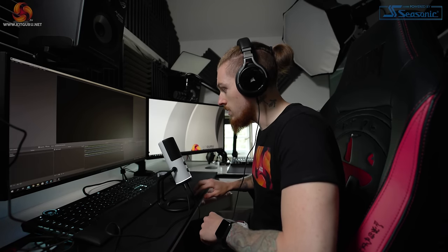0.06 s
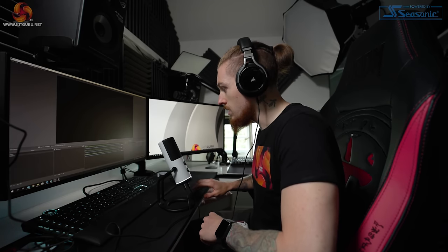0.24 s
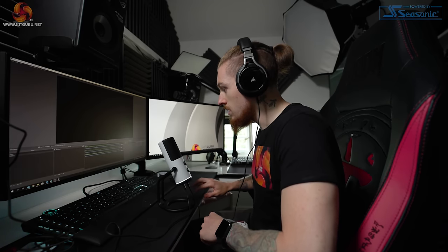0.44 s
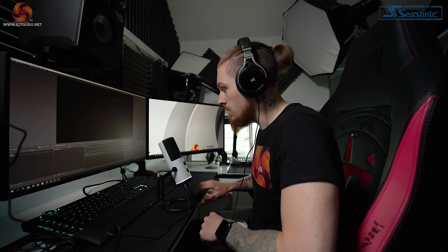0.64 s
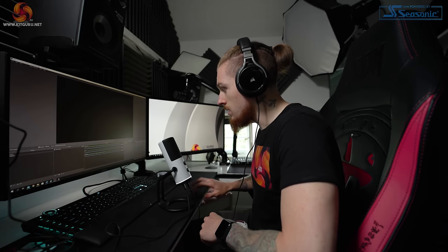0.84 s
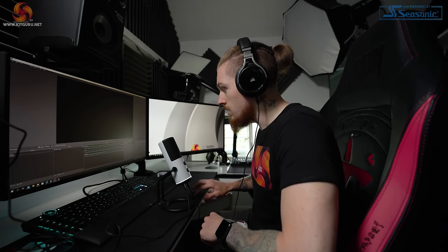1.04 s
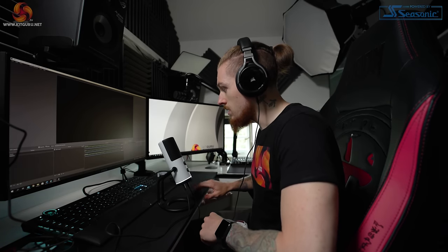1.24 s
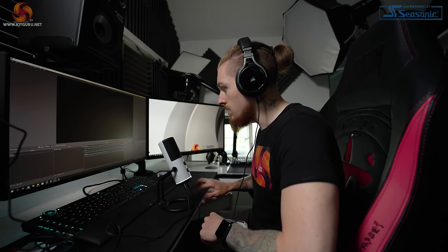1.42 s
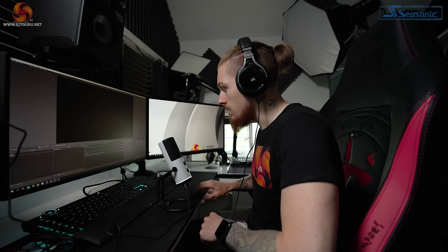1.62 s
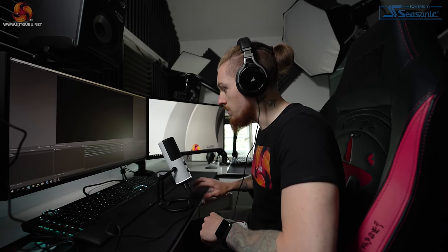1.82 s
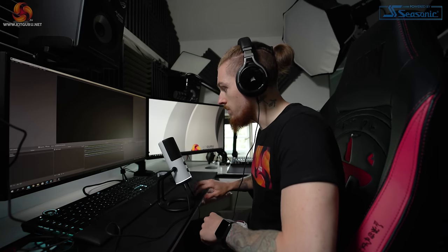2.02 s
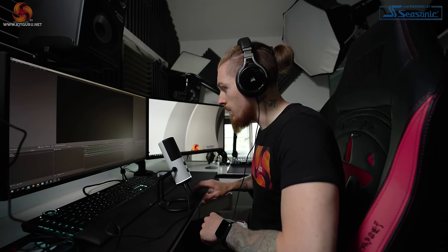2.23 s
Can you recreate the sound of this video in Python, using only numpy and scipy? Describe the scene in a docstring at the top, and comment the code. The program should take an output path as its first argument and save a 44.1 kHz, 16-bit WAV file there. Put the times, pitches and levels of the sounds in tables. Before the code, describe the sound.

Soft, boomy finger drumming on a desktop, rolling steadily, with one tiny sharp click near the end

```python
"""Low thumps come first and lead throughout: four fingers drum in quick rolls on a desk.
Each push sets the desk top ringing and reaches the microphone through the stand, which passes the lows.
The fingertips also tick faintly through the air: two tiny slaps make the surface ring.
A small hard part clicks near the end. Below it all lie room hiss (bands of noise) and
a fan (narrow wavering tones)."""
import sys
import numpy as np
from scipy import signal
from scipy.io import wavfile

SR = 44100
rng = np.random.default_rng(int(sys.argv[2]) if len(sys.argv) > 2 else 0)


def waveform_to_disk(signal):
    """Save audio, clipped to [-1, 1], as 16-bit WAV at the path in sys.argv[1]."""
    frames = np.transpose(np.atleast_2d(signal))
    scaled = np.clip(frames, -1, 1) * 32767
    samples = np.round(scaled).astype(np.int16)
    wavfile.write(sys.argv[1], SR, samples)


N = 100151   # length in samples
PAD = 8192   # extra samples ahead of the start, so that sounds can already be under way

# finger taps, four fingers in turn: push time [t/s], push [level/dB], tick peak before the sheen [level/dB],
# sheen against the tick [level/dB]
TAPS = [(-0.0627, 2.5, -40, -13), (-0.0099, -10, -29, -3), (0.2229, -12, -50.5, -4),
        (0.244, -5.6, -50.5, -10.8), (0.2672, 1.5, -40, -7.4), (0.3053, -5.5, -44, -4),
        (0.558, -20, -52.5, -15), (0.5725, -7.5, -49, -9), (0.5996, -1, -39, -9.7),
        (0.6516, -0.5, -44.5, -5.5), (0.8595, -11, -53, -4), (0.8798, -8, -48, -13.0),
        (0.906, 1.8, -38.5, -5), (0.9609, -6, -45.5, -11), (1.199, -11, -56.4, 1),
        (1.2186, -8.5, -50.5, -19), (1.241, 1.2, -37.5, -5.5), (1.2925, -3.0, -43.5, -6),
        (1.5476, -12.5, -55.1, -11), (1.5649, -7, -51.2, -15), (1.5871, 2.5, -37.5, -11.5),
        (1.6505, -3, -42.5, -12.7), (1.8671, -14, -63, -4.8), (1.8947, -10.5, -50.5, -7.0),
        (1.9222, 1.3, -39, -5.5), (1.9644, -2.5, -42, -4.8), (2.1858, -12, -54, -13), (2.2124, -9, -49, 1),
        (2.2405, 0, -39, -5)]
# how long each finger presses, fingers 0 to 3: [t/s]
CONTACT_S = [0.01183, 0.00747, 0.00765, 0.00811]
# how far each finger's tick starts ahead of its push: [t/s]
TICK_LEAD_S = [0.00063, .0015, .0005, 0.00062]
# time between the two slaps of each fingertip: [t/s]
SECOND_TOUCH_S = [.002, .002, .00135, .0024]
# ringing of desk top and stand: [f/Hz], [level/dB], time to fade by 60 dB [t/s], direction [+1 or -1]
DESK = [(29.1, -38.5, 0.66, 1), (40.07, -18, 0.48, -1), (43.55, -21.5, 0.29, 1), (66.12, -30, 0.47, 1),
        (81.9, -42.5, 0.48, 1), (103.4, -21.5, 0.1, 1), (132.3, -37.5, .33, 1), (152.65, -19, 0.18, -1),
        (218.9, -26, 0.31, 1), (267.6, -18, 0.12, 1), (299.3, -16.5, 0.22, -1), (370.5, -11.5, 0.1, -1)]
# ringing of the surface under the fingertip: [f/Hz], [level/dB], time to fade by 60 dB [t/s]
SURFACE = [(1344, -10, 0.0024), (1800, -2, 0.0021), (2305, 2, 0.0086), (3010, -7.5, 0.0039),
           (4180, -8, 0.0032), (4900, -13, 0.0013)]
# the bright upper part of the tick: [f/Hz], [level/dB], time to fade by 60 dB [t/s]
SHEEN = [(6700, -11, 0.0012), (9000, -13, 0.0029), (10980, -2.5, 0.0016), (14000, -18.5, .002)]
# light brushes with no push: start [t/s], tick [level/dB], sheen against the tick [level/dB]
BRUSHES = [(0.5338, -56.5, 3.5), (1.9406, -49, -10)]
# ringing of the small hard clicking part: [f/Hz], [level/dB], time to fade by 60 dB [t/s]
CLICK = [(4500, -14, 0.0024), (7150, -26, 0.0024), (8800, 0, 0.0033), (9700, 5.5, 0.0037),
         (10200, 10, 0.0045), (11490, -11, 0.0085), (13900, -9, 0.0022)]
# colour of the room hiss: [f/Hz], relative level per Hz [level/dB]
HISS = [(35, -31.5), (60, -7), (98, -7), (244, -0.5), (417, -8.5), (553, -8.5), (698, -16.5), (1310, -14),
        (2580, -26), (2840, -28.5), (4420, -29.5), (14600, -31), (16000, -34)]
# fan tones: [f/Hz], rms [level/dB]
FAN = [(929, -82), (1013, -83.5), (1097, -94.5), (1182, -89), (1297, -77.5)]

STAND_CUT_HZ, MIC_BASS_CUT_HZ = 173.7, 51.9
RUMBLE_DB, RUMBLE_CUT_HZ = -54.5, 129   # floor tremor that keeps the desk ringing
SECOND_TOUCH_DB, SCRUB_DB = -1, -16.5   # second slap; rough contact between the two
TICK_SPREAD_DB = -1   # chance in each mode's strength; the sign makes no difference
TICK_ROOM_DB, ROOM_T60_S = -7, 0.094
ROOM_RISE_S = 0.0048   # the room's answer swells over this time
CLICK_S, CLICK_DB = 2.2182, -18   # level before the lows are thinned
CLICK_THIN_HZ = 5000   # the part is too small to radiate well below this
CLICK_BOUNCE_S, CLICK_BOUNCE_DB = 0.0017, -17
CLICK_TAIL_DB, CLICK_TAIL_T60_S = -18, 0.095
HISS_DB, HISS_PATCHY_DB = -60, 1.0   # overall level; depth of the flicker in each band
FAN_WIDTH_HZ = 5.9
TOP_STOP_HZ = 16300   # from here up the sound is 60 dB down


def from_db(db):
    """Turn dB into a gain."""
    return 10 ** (np.asarray(db) / 20)


def rms_one(x):
    """Scale to rms 1."""
    return x / np.sqrt(np.mean(x ** 2) + 1e-20)


def cut(sound, order, hz, kind):
    """Filter that keeps the lows, the highs or a band."""
    return signal.sosfilt(signal.butter(order, hz, kind, fs=SR, output="sos"), sound)


def ring(force, hz, t60):
    """A resonance: a unit click sets off a fading sine that starts at height 1."""
    r = from_db(-60 / (t60 * SR))
    w = 2 * np.pi * hz / SR
    return signal.lfilter([0, np.sin(w)], [1, -2 * r * np.cos(w), r * r], force + 1e-18)


def add(track, s, shape):
    """Add a shape at a time in seconds; the track starts PAD samples early."""
    i = PAD + int(s * SR)
    track[i:i + len(shape)] += shape[:len(track) - i]


def drift(hz):
    """Slow random wandering with rms 1: noise smoothed twice."""
    r = np.exp(-2 * np.pi * hz / SR)
    wander = signal.lfilter([1], [1, -2 * r, r * r], rng.standard_normal(N + PAD))
    return rms_one(wander[PAD:])


def finger(k):
    """Which finger, 0 to 3, plays row k of the taps; row 0 is finger 2."""
    return (k + 2) % 4


def strike(modes, burst, spread_db):
    """A burst of force rings every mode with a strength of its own; 60 ms long, peak 1."""
    force = np.r_[burst, np.zeros(2646 - len(burst))]
    out = 0
    for hz, db, t60 in modes:
        gain = from_db(db + spread_db * rng.standard_normal())
        out = out + gain * ring(force, hz, t60)
    return out / np.abs(out).max()


def tail(sound, t60):
    """Room tail: many random echoes swell, then fade, with about the energy of the sound."""
    s = np.arange(8820) / SR   # 0.2 s
    fade = from_db(-60 * s / t60)
    rise = np.minimum(s / ROOM_RISE_S, 1)
    echoes = rng.standard_normal(len(s)) * fade * rise
    echoes = echoes / np.sqrt(np.sum(echoes ** 2))
    return signal.fftconvolve(sound, echoes)[:len(sound)]


def thumps():
    """Half-sine pushes and a faint tremor ring the desk; the stand passes mainly the lows."""
    force = np.zeros(PAD + N)
    for k, (s, push_db, _, _) in enumerate(TAPS):
        push = np.sin(np.linspace(0, np.pi, int(CONTACT_S[finger(k)] * SR)))
        add(force, s, from_db(push_db) * push / push.sum())
    tremor = rng.standard_normal(PAD + N)
    both = np.stack([force, tremor])
    desk = 0
    for hz, db, t60, way in DESK:
        desk = desk + np.sign(way) * from_db(db) * ring(both, hz, t60)
    desk = cut(desk, 2, STAND_CUT_HZ, "low")
    desk = cut(desk, 2, MIC_BASS_CUT_HZ, "high")
    rumble = cut(desk[1], 4, RUMBLE_CUT_HZ, "low")[PAD:]
    return desk[0, PAD:] + from_db(RUMBLE_DB) * rms_one(rumble)


def ticks():
    """Each fingertip slaps the surface twice within a few milliseconds, scrubbing in between."""
    touches = []
    for k, (s, _, db, bright_db) in enumerate(TAPS):
        if s > 0:
            touches.append((s - TICK_LEAD_S[finger(k)], db, bright_db, SECOND_TOUCH_S[finger(k)]))
    for s, db, bright_db in BRUSHES:
        touches.append((s, db, bright_db, SECOND_TOUCH_S[0]))

    out = np.zeros(PAD + N)
    for s, db, bright_db, gap_s in touches:
        scrub = rng.standard_normal(441)[:int(gap_s * SR) + 1]
        burst = from_db(SCRUB_DB) * scrub
        burst[[0, -1]] = 1, from_db(SECOND_TOUCH_DB)   # the two slaps
        body = strike(SURFACE, burst, TICK_SPREAD_DB)
        sheen = from_db(bright_db) * strike(SHEEN, burst, TICK_SPREAD_DB)
        add(out, s, from_db(db) * (body + sheen))
    return (out + from_db(TICK_ROOM_DB) * tail(out, ROOM_T60_S))[PAD:]


def click():
    """One sharp bright snap rings a small hard part, with a faint bounce and a thin hissing tail."""
    out = np.zeros(PAD + N)
    snap = from_db(CLICK_DB) * cut(strike(CLICK, np.ones(1), 0), 2, CLICK_THIN_HZ, "high")
    add(out, CLICK_S, snap)
    add(out, CLICK_S + CLICK_BOUNCE_S, from_db(CLICK_BOUNCE_DB) * snap)
    return (out + from_db(CLICK_TAIL_DB) * tail(out, CLICK_TAIL_T60_S))[PAD:]


def hiss():
    """Room hiss: half-octave bands of noise, each flickering a little."""
    edges = 45 * 2 ** np.arange(0, 8.9, 0.5)
    white = rng.standard_normal((2, N + PAD))   # neighbouring bands use different noise
    hz, db = np.transpose(HISS)
    out = 0
    for k, (low, high) in enumerate(zip(edges, edges[1:])):
        band = cut(white[k % 2], 2, [low, high], "band")[PAD:]
        log_middle = np.log(low * high) / 2
        band_db = np.interp(log_middle, np.log(hz), db)
        out = out + from_db(band_db + HISS_PATCHY_DB * drift(20)) * band
    return from_db(HISS_DB) * rms_one(out)


def fan():
    """Fan tones: noise through sharp resonances gives narrow tones that waver."""
    t60 = np.log(1000) / np.pi / FAN_WIDTH_HZ   # a narrower tone rings longer
    out = 0
    for hz, db in FAN:
        tone = ring(rng.standard_normal(N + PAD), hz, t60)[PAD:]
        out = out + from_db(db) * rms_one(tone)
    return out


def scene():
    """All sources added together in one channel."""
    return (thumps() + ticks() + click() + hiss() + fan())[None]


def record(dry):
    """A steep filter cuts off the very top of the treble."""
    return signal.sosfilt(signal.cheby2(16, 60, TOP_STOP_HZ, fs=SR, output="sos"), dry)


dry = scene()
out = record(dry)
waveform_to_disk(out)
```